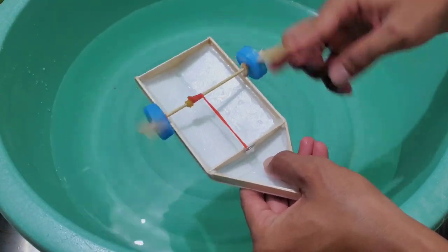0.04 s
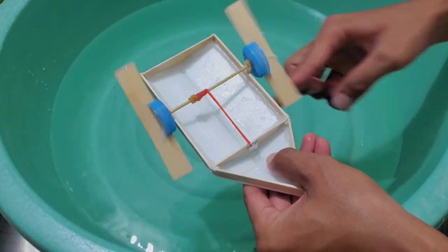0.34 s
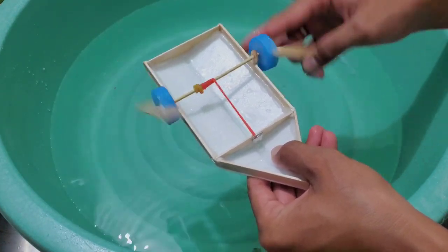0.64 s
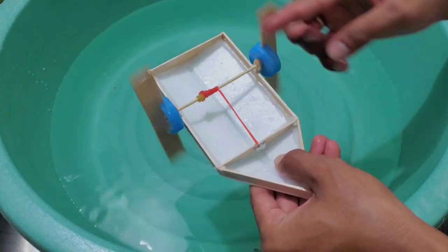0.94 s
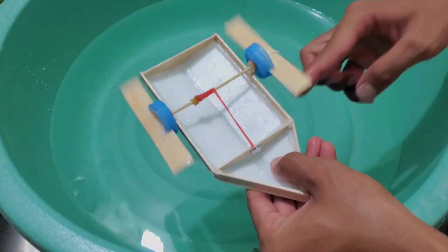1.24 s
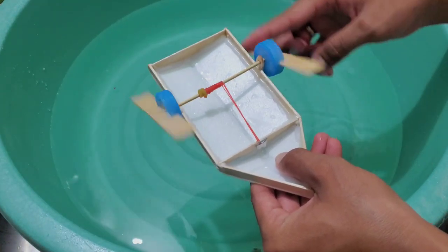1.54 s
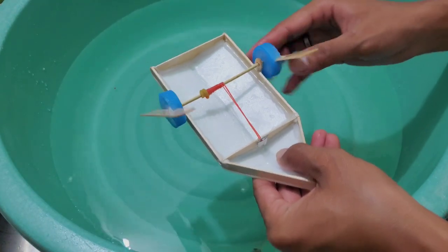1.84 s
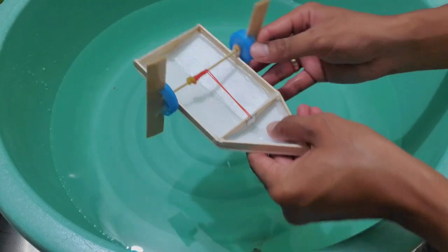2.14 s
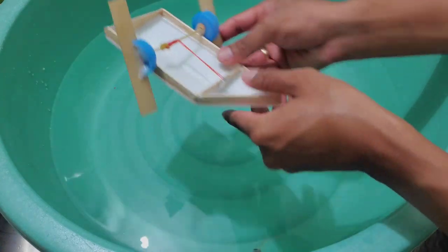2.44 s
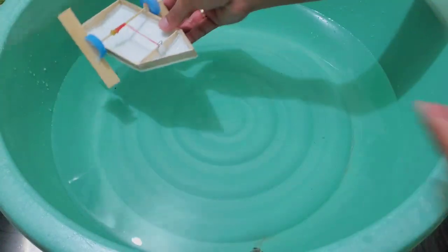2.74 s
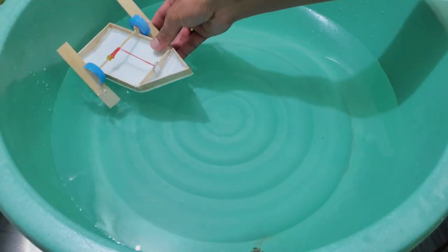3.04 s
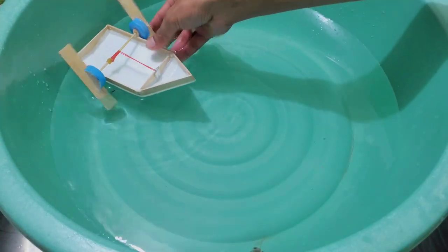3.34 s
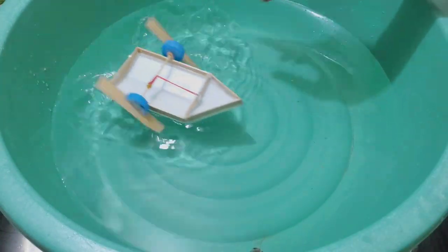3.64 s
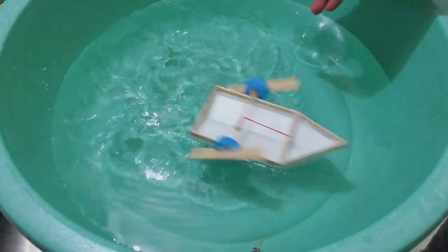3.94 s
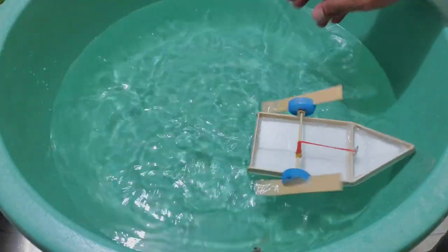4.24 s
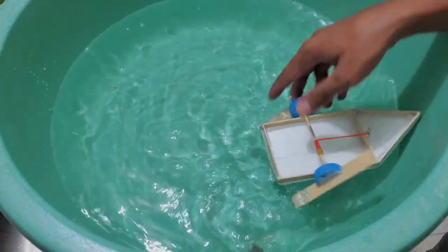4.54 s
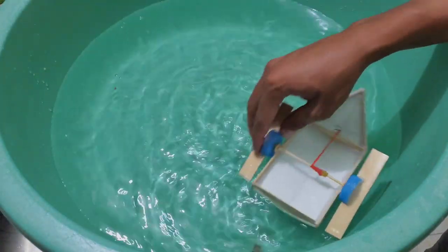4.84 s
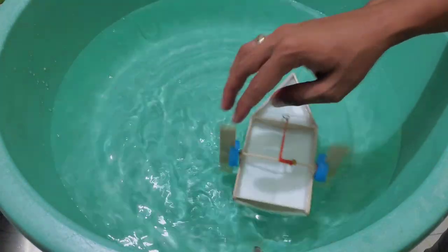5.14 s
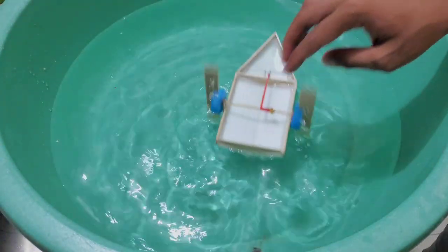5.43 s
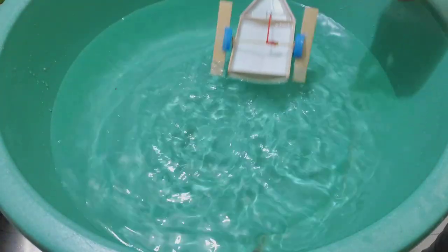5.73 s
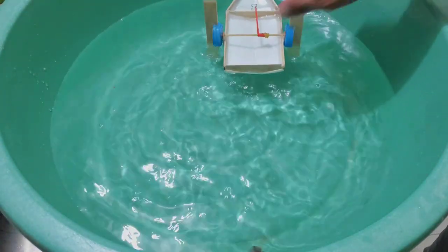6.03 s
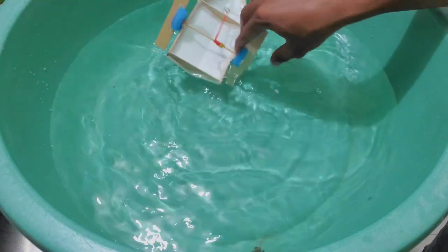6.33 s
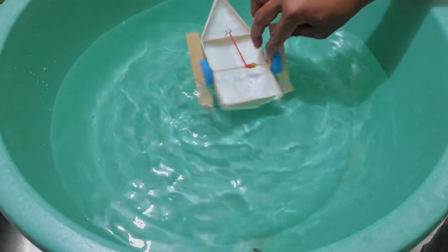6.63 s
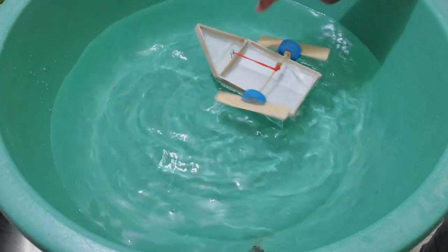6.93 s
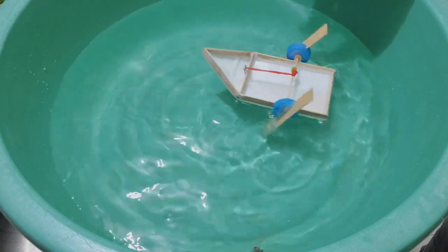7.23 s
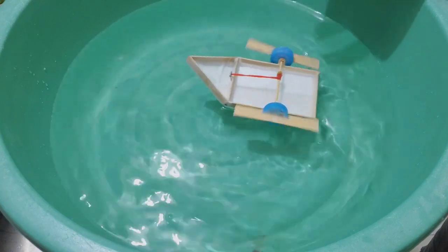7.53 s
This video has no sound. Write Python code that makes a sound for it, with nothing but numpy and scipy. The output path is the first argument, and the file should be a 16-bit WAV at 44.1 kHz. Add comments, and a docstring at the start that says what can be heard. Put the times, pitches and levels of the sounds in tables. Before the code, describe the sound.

A wooden toy boat's axle creaks as it is wound, then its paddles splash and the boat thumps against a plastic basin.

```python
"""A toy boat with wooden paddle wheels is wound by hand, then let go in a plastic basin of water.
Winding: the axle sticks and slips, creaking and ticking in the hull; fingers brush the wood.
Running: paddles slap the water, which fizzes and bubbles; the boat thumps and rings the basin.
Behind it, in a small hard room: a faint electric motor, thin far squeals and a low rumble."""
import sys
import numpy as np
from scipy import signal
from scipy.fft import rfft, irfft
from scipy.io import wavfile
from scipy.ndimage import uniform_filter1d

SR = 44100
rng = np.random.default_rng(int(sys.argv[2]) if len(sys.argv) > 2 else 0)


def to_wav(s):
    """Save 16-bit WAV."""
    ch = np.atleast_2d(s).T  # columns
    pcm = np.round(np.clip(ch, -1, 1) * 32767)  # PCM
    wavfile.write(sys.argv[1], SR, pcm.astype(np.int16))


N = 334278
T = np.arange(N) / SR

# wooden hull modes: f/Hz, t60/s, energy/dB
HULL_MODES = [(524, 0.042, -33), (647, 0.033, -6.5), (790, 0.0034, 1), (1156, 0.0076, 6.5),
              (1340, 0.0046, -10), (1864, 0.0076, 7), (2053, 0.029, -5)]
# boat hits basin: t/s, peak/dB, contact f/Hz, rattle/dB re peak, shove peak/dB
BASIN_HITS = [(4.165, -11, 2880, 2, -20.5), (4.2738, -17, 1880, -1, -28), (4.428, -29, 1380, -27, -40),
              (5.783, -5, 2900, -21, -25.5), (5.999, -17.5, 2190, -16, -44),
              (6.067, -26.5, 1450, -29, -33.5), (6.211, -34, 1050, -18, -42)]
# paddles hit water: t/s, spray/dB, slap/dB, left minus right/dB
PADDLE_SLAPS = [(3.738, -22, -33.5, 2.5), (3.889, -36, -60, 6), (3.9284, -23.5, -29, 11),
                (3.937, -24, -30.5, -9.5), (4.131, -25.5, -35, 0), (4.146, -29, -25.5, 6),
                (4.249, -38, -34.5, -9.5), (4.38, -34.5, -59, 6), (4.461, -33, -48, 3),
                (5.014, -48, -50, 11), (5.1096, -35, -48.5, 7.5), (5.434, -28.5, -35, 3.5),
                (5.658, -26.5, -34, 3.5), (5.9826, -36, -38, 6), (6.087, -40, -60, 10),
                (6.2813, -35.5, -40, 5.5), (6.316, -43, -36.5, 5.5)]


def undb(db):
    """Decibels to gain."""
    return 10 ** (np.asarray(db) / 20)


def level(x, db):
    """Set the rms level."""
    return x * undb(db) / np.sqrt(np.mean(x ** 2) + 1e-20)


def peak(x, db):
    """Set the rms level of the loudest 3 ms."""
    return x * undb(db) / np.sqrt(uniform_filter1d(x ** 2, size=132).max() + 1e-20)


def pan(x, left_db):
    """Stereo, left_db louder on the left than on the right."""
    return x * undb(np.array([[left_db], [-left_db]]) / 2)


def add(track, start_s, x):
    """Mix a short sound into a track."""
    i = max(int(start_s * SR), 0)
    track[..., i:i + x.shape[-1]] += x[..., :N - i]


def band(x, lo_hz, hi_hz):
    """Band-pass."""
    sos = signal.butter(2, [lo_hz, min(hi_hz, SR / 2 - 100)], "band", fs=SR, output="sos")
    return signal.sosfilt(sos, x)


def at_hz(hz, points):
    """Interpolate (f/Hz, value) points over log frequency."""
    f, value = np.transpose(points)
    return np.interp(np.log(hz + 1), np.log(f), value)


def walk(rate_hz):
    """Random drift, spread near 1."""
    step = int(SR / rate_hz)
    return uniform_filter1d(np.repeat(rng.standard_normal(N // step + 1), step), step)[:N]


def fade(t, t60_s):
    """Exponential decay."""
    return np.exp(-np.log(1000) * t / t60_s)


def swell(start_s, attack_s, length_s, t60_s):
    """Envelope: rise, hold until length_s, decay."""
    return np.clip((T - start_s) / attack_s, 0, 1) * fade(np.clip(T - start_s - length_s, 0, 2), t60_s)


def ring(modes, length_s, rise=0.019):
    """Modal impulse response; each mode builds up over rise * t60."""
    t = np.arange(int(length_s * SR)) / SR
    out = np.zeros(len(t))
    for hz, t60_s, db in modes:
        envelope = fade(t, t60_s) * (1 - np.exp(-t / (rise * t60_s)))
        out += undb(db) / np.sqrt(t60_s) * envelope * np.sin(2 * np.pi * hz * t)
    return out


def blows(hits, modes, rise, low_hz, hardness):
    """Blows ring one body; a softer contact leaves out the treble."""
    out, body = np.zeros(N), ring(modes, 0.93, rise)
    for start_s, db, contact_hz in hits:
        cutoff_hz = max(hardness * contact_hz, 2 * low_hz)
        add(out, start_s, peak(band(body, low_hz, cutoff_hz), db))
    return out


def chirp(hz, t60_s, glide):
    """Dying tone; pitch moves by the fraction glide."""
    t = np.arange(int(t60_s * SR)) / SR
    return fade(t, t60_s) * np.sin(2 * np.pi * hz * t * (1 + glide * t / t60_s / 2))


def grains(times_s, sizes, lo_hz, hi_hz, cycles, samples):
    """Droplets and tiny bubbles, each a few cycles at its own pitch."""
    hz = rng.uniform(lo_hz, hi_hz, (len(times_s), 1))
    k = np.arange(300)
    waves = sizes[:, None] * np.sqrt(hz) * fade(k / SR, cycles / hz) * np.sin(2 * np.pi * hz * k / SR)
    waves *= rng.choice([-1, 1], (len(times_s), 1))
    index = (times_s * SR).astype(int)[:, None] + k
    return np.bincount(index.ravel(), waves.ravel(), samples)[:samples]


def space(x, near_db, room_db, right_lag_samples=0):
    """Direct sound, quick echoes off the basin walls, then the room's tail."""
    # room decay: f/Hz, t60/s
    room_decay = [(100, 0.96), (300, 0.65), (900, 0.45), (2500, 0.47), (6000, 0.39), (14000, 0.29)]
    t, hz = np.arange(SR) / SR, np.arange(SR // 2 + 1)
    mid, side = rfft(rng.standard_normal((2, SR)))
    width = hz / np.hypot(hz, 650)  # long waves arrive alike left and right
    noise = irfft((mid + side * width * np.array([[1], [-1]])) / np.sqrt(1 + width ** 2), SR)
    edges_hz = np.geomspace(30, 20000, 10)
    tail = sum(band(noise, lo, hi) * fade(t, at_hz(np.sqrt(lo * hi), room_decay))
               for lo, hi in zip(edges_hz, edges_hz[1:]))
    tail *= np.clip(t / 0.016, 0, 1)
    near = noise[:, ::-1] * fade(t, t60_s=0.081) * (t > .001)
    response = (level(near, near_db) + level(tail, room_db)) / np.sqrt(SR)
    left, right = x * np.ones((2, 1))
    direct = np.array([left, np.roll(right, right_lag_samples)])
    return direct + signal.fftconvolve(np.atleast_2d(x), response, axes=1)[:, :N]


def room_tone(rumble_db=-57, side_db=-13, hiss_db=-68):
    """Near-mono rumble under an even hiss."""
    # rumble spectrum: f/Hz, relative density/dB
    spectrum = [(15, -44), (25, -32), (44, -10.5), (107, -3), (247, -18), (306, -15.5), (329, -24.5),
                (400, -18.5), (543, -28), (1800, -34), (2340, -70), (3960, -120)]
    hz = np.arange(N // 2 + 1) * SR / N
    mid, side = irfft(rfft(rng.standard_normal((2, N))) * undb(at_hz(hz, spectrum)), N)
    rumble = level(mid, 0) + level(side, side_db) * np.array([[1], [-1]])
    return rumble * undb(rumble_db) + level(rng.standard_normal((2, N)), hiss_db)


def motor(hum_gain_db=0.5, waver_db=2.5, right_lead_s=.00008, throb_period_s=.404, throb_peak_s=.89):
    """Wavering hum and whine; throbbing hiss in the casing's resonances."""
    # hum and whine: f/Hz, level/dB
    partials = [(53.8, -64), (102.3, -64), (301.5, -78.5), (403.7, -70), (1206, -84.5), (1308, -81.5),
                (1615, -83), (2019, -71), (2083, -79), (2164, -61), (2283, -67.5), (2842, -81)]
    # casing hiss: f/Hz, width/Hz, level/dB, throb/dB
    hiss_bands = [(2150, 246, -58, 0), (3000, 640, -63.5, 3.5), (4800, 590, -71, -1),
                  (7320, 1400, -67.5, 0), (10770, 1300, -66, 0)]
    out = np.zeros((2, N))
    for hz, db in partials:
        phase = 2 * np.pi * hz * (T + np.array([[0], [right_lead_s]])) + .5 * walk(8)
        out += level(np.sin(phase) * undb(waver_db * walk(9)), db + hum_gain_db)
    throb = np.cos(2 * np.pi * (T - throb_peak_s) / throb_period_s)
    for hz, width_hz, db, throb_db in hiss_bands:
        hiss = band(rng.standard_normal((2, N)), hz - width_hz / 2, hz + width_hz / 2)
        out += level(hiss * undb(throb_db * throb + .5 * walk(5.4)), db)
    return out


def bearing(turn_s=.09416, chirp_s=.02, scatter_db=2, gain_db=-3):
    """The motor's bearing repeats a pattern of falling chirps each turn."""
    # chirps of one turn: t/s, f/Hz, peak/dB
    pattern = [(.005, 7550, -54), (.022, 7550, -60.5), (.047, 8100, -56), (.083, 7500, -59)]
    out = np.zeros(N)
    attack = np.minimum(np.arange(int(chirp_s * SR)) / 260, 1) ** 2
    for start_s in np.arange(.003, T[-1] - turn_s / 2, turn_s):
        for offset_s, hz, db in pattern:
            tone = peak(chirp(hz, chirp_s, glide=-.12) * attack, db + scatter_db * rng.standard_normal())
            add(out, min(start_s + offset_s, T[-1]), tone)
    return out * undb(gain_db)


def squeals(waver=0.0099, gain_db=2):
    """Thin far squeals: harmonics 3, 5 and 6 swell and die away."""
    # squeals: t/s, length/s, fundamental f/Hz, level/dB
    events = [(.92, .11, 630, -59), (1.04, .14, 637, -66), (3.12, .22, 628, -62), (3.35, .1, 590, -62),
              (5.54, .16, 628, -62.5), (5.72, .08, 632, -60)]
    out, drift = np.zeros(N), 1 + waver * walk(150)
    for start_s, length_s, hz, db in events:
        phase = 2 * np.pi * hz * np.cumsum(drift[int(start_s * SR):int((start_s + length_s) * SR)]) / SR
        tone = undb(-4) * np.sin(3 * phase) + undb(-9) * np.sin(5 * phase) + np.sin(6 * phase)
        add(out, start_s, undb(db + gain_db) * tone * np.sin(np.linspace(0, np.pi, len(phase))))
    return out


def bubbles():
    """Air pockets ring, rising in pitch as they near the surface."""
    # largest air pockets: t/s, f/Hz, peak/dB, t60/s
    pockets = [(3.731, 1460, -45, 0.065), (3.739, 241, -41.5, 0.035), (3.765, 2630, -40.5, .039),
               (3.932, 470, -27, 0.028), (4.062, 2100, -43, 0.085), (4.39, 4640, -45, 0.043),
               (4.463, 5230, -44, 0.021), (4.55, 3490, -46.5, .06), (5.025, 3580, -47, .05),
               (5.44, 1387, -51, 0.24), (5.489, 2710, -45, .029), (5.658, 4400, -34.5, 0.013),
               (6.317, 1277, -46.5, 0.066)]
    out = np.zeros(N)
    for start_s, hz, db, t60_s in pockets:
        add(out, start_s, peak(chirp(hz, t60_s, glide=0.13), db))
    return out


def drops(lo_hz, hi_hz, cycles, count, scatter_db=3):
    """Drops at random times, a few much louder; unit rms."""
    sizes = undb(scatter_db * np.minimum(rng.exponential(1, count), 4))
    return level(grains(rng.random(count) * T[-1], sizes, lo_hz, hi_hz, cycles, N), 0)


def wash(fizz_gain_db=-2, trickle_gain_db=-6):
    """Water fizzes and trickles after each slap and as a hand swirls through it."""
    # hand swirls through the water: t/s, length/s, fizz/dB, trickle/dB
    sweeps = [(3.637, .035, -64, -48.5), (3.745, 0.055, -58, -51.5), (4.47, .15, -51.5, -55.5),
              (4.99, .16, -65.5, -57.5), (5.44, .04, -68, -54.5), (5.556, 0.071, -62.5, -55.5),
              (6.2, 0.065, -58, -68)]
    wake = sum(undb(spray_db) * swell(start_s, attack_s=.012, length_s=.012, t60_s=.3)
               for start_s, spray_db, _, _ in PADDLE_SLAPS)
    fizz_env, trickle_env = wake * undb(-35), wake * undb(-33)
    for start_s, length_s, fizz_db, trickle_db in sweeps:
        sweep = swell(start_s, attack_s=0.015, length_s=length_s, t60_s=0.27)
        fizz_env += undb(fizz_db) * sweep
        trickle_env += undb(trickle_db) * sweep
    fizz = drops(9300, 20000, cycles=15, count=3000) * fizz_env * undb(fizz_gain_db)
    trickle = drops(1600, 5200, cycles=13.4, count=2200) * trickle_env * undb(trickle_gain_db)
    return pan(fizz + trickle, left_db=3)


def splashes(spray_gain_db=-8, slap_gain_db=-3, scatter_db=6, tear_s=.0022, fall_s=0.038, fall_db=-19):
    """A paddle or the jolted hull tears the surface; thrown drops fall back just after."""
    out = np.zeros((2, N))
    jolts = [(start_s, db - 23, db - 15.5, 4) for start_s, db, *_ in BASIN_HITS]
    falling = np.arange(40) % 2
    for start_s, spray_db, slap_db, left_db in PADDLE_SLAPS + jolts:
        times_s = rng.gamma(2, .5, len(falling)) * np.where(falling, fall_s, tear_s)
        sizes = undb(scatter_db * rng.standard_normal(len(falling)) + fall_db * falling)
        spray = grains(times_s, sizes, 4200, 17000, cycles=5, samples=SR // 4)
        slap = band(grains(times_s, sizes, 1100, 6200, cycles=6, samples=SR // 4), 200, 4500)
        splash = peak(spray, spray_db + spray_gain_db) + peak(slap, slap_db + slap_gain_db)
        add(out, start_s, pan(splash, left_db))
    return out


def finger_brushes(gain_db=-3):
    """Skin drags over dry wood: gritty hiss with a little hull tone."""
    # strokes: t/s, length/s, level/dB, body/dB re level
    strokes = [(2.267, 0.04, -54, -3), (2.341, 0.098, -56, -5.5), (3.01, 0.079, -64, -1.5),
               (3.414, 0.16, -61.5, -1.5), (4.846, 0.068, -69, 6)]
    out = np.zeros(N)
    for start_s, length_s, db, body_db in strokes:
        grit = (rng.standard_normal(SR // 4) ** 3)[:int(length_s * SR)]
        grit *= np.hanning(len(grit))
        add(out, start_s, level(band(grit, 1700, 12300), db) + level(band(grit, 480, 1800), db + body_db))
    return out * undb(gain_db)


def hull_ticks(gain_db=-5):
    """Axle and paddles knock on the hull and ring it."""
    # knocks: t/s, peak/dB, contact f/Hz
    knocks = [(.3283, -13, 1340), (.730, -35, 496), (.749, -25.5, 460), (1.149, -37, 380)]
    return blows(knocks, HULL_MODES, rise=0.0045, low_hz=367, hardness=1.95) * undb(gain_db)


def axle_creaks(jitter=0.27, scatter_db=2, gain_db=-2.5):
    """The axle sticks and slips; each slip rings the hull while dry wood rubs."""
    # axle turns: t/s, length/s, level/dB, brightness/dB, start-to-end swell/dB
    turns = [(0.0, 0.053, -34, -3.5, 0.5), (0.18, 0.062, -43, -1, 9), (.335, 0.06, -29.5, -2, 8.5),
             (.413, 0.041, -44, -8, 0), (0.619, 0.036, -35.5, 7, -1), (0.777, 0.057, -31, -2, 1.5),
             (1.012, 0.067, -33, 6.5, -6.5), (1.211, .025, -32.5, -2.5, 6), (1.452, 0.089, -36, 4.5, -4),
             (1.883, 0.018, -48, -11, 9), (2.033, 0.038, -46.5, -3, 3)]
    out, samples = np.zeros(N), SR // 4
    for start_s, length_s, db, bright_db, swell_db in turns:
        effort_db = db + 34
        slip_hz = 620 + 7 * effort_db  # harder turns slip faster
        rub_db = -18 + 0.82 * bright_db - 0.23 * effort_db  # loud turns bury the rubbing
        gap_noise, size_noise = rng.standard_normal((120, 2)).T
        times_s = np.cumsum(np.exp(jitter * gap_noise)) / slip_hz
        times_s -= times_s[0]
        sizes = undb(scatter_db * size_noise + swell_db * times_s / length_s) * (times_s < length_s)
        slips = np.bincount((times_s * SR).astype(int), sizes, SR)[:samples]
        modes = [(hz, t60_s, mode_db + bright_db * (hz > 1500)) for hz, t60_s, mode_db in HULL_MODES]
        creak = band(signal.fftconvolve(slips, ring(modes, .06))[:samples], 452, 2110)
        pressure = uniform_filter1d(slips, size=200)
        rub = level(band(pressure * rng.standard_normal(samples), 2270, 4830), 0)
        rub += level(band(pressure * rng.standard_normal(samples), 4000, 11700), -5.5)
        turn = level(creak, db) + level(rub, db + rub_db)
        add(out, start_s, turn * np.sqrt(length_s * SR / samples))
    return out * undb(gain_db)


def basin_thumps(shove_contact_hz=183, rattle_s=.00267, rattle_step_db=2.23, gain_db=-6):
    """The boat hits and shoves the basin wall, then rattles in ever slower, weaker knocks."""
    # filled basin, long wall modes and short plastic crack: f/Hz, t60/s, energy/dB
    basin_modes = [(58.5, 2.4, -10), (124, 0.44, -8.5), (167.3, 0.43, -8), (259, 0.71, -19.5),
                   (312, 0.25, -8.5), (415, 0.1, 2.5), (805, .22, -5), (880, 0.07, -10), (971, 0.4, -11.5),
                   (1098, 0.16, -3), (1398, 0.12, -18.5), (1040, 0.012, 8.5), (1220, 0.0028, 11),
                   (1990, 0.0024, 4.5), (2720, 0.0045, -3)]
    hits = []
    for start_s, db, contact_hz, rattle_db, shove_db in BASIN_HITS:
        hits += [(start_s, db, contact_hz), (start_s, shove_db, shove_contact_hz)]
        for k in range(1, 5):
            hits.append((start_s + rattle_s * k * k, db + rattle_db - rattle_step_db * k, contact_hz))
    return blows(hits, basin_modes, rise=0.066, low_hz=40, hardness=1.3) * undb(gain_db)


def scene():
    """The boat is wound close by; on the water it is further off, with more room sound."""
    winding = axle_creaks() + finger_brushes() + hull_ticks()
    boat = space(winding, near_db=-2.5, room_db=-2.5, right_lag_samples=3)
    boat += space(basin_thumps(), near_db=0, room_db=-1)
    water = space(splashes(), near_db=-1.5, room_db=-1, right_lag_samples=5)
    water += space(wash(), near_db=7, room_db=-5.5)
    water += space(bubbles(), near_db=-0.5, room_db=-40)
    background = space(squeals(), near_db=-3, room_db=1) + motor()
    background += space(bearing(), near_db=-7, room_db=-8, right_lag_samples=7)
    return pan(boat, left_db=1.4) + water + background + room_tone()


def record(dry, low_hz=40, top_hz=15900):
    """Cut the deepest bass and the top."""
    dry = signal.sosfilt(signal.butter(4, low_hz, "high", fs=SR, output="sos"), dry)
    return signal.sosfilt(signal.ellip(10, .2, 70, top_hz, fs=SR, output="sos"), dry)


dry = scene()
out = record(dry)
to_wav(out)
```